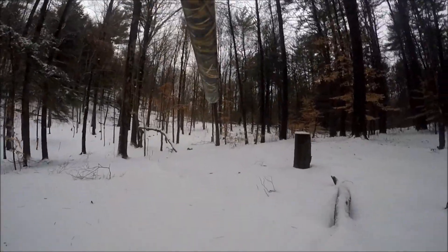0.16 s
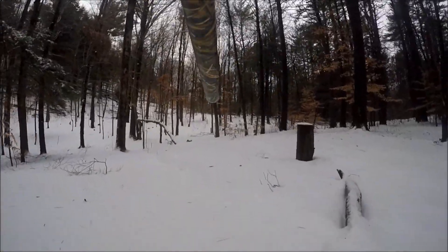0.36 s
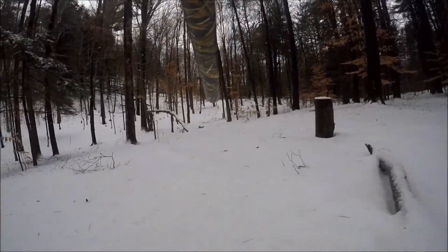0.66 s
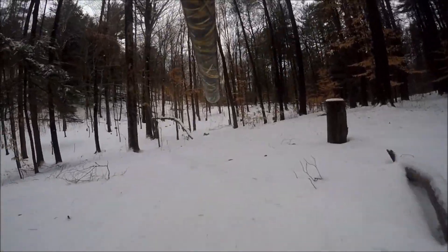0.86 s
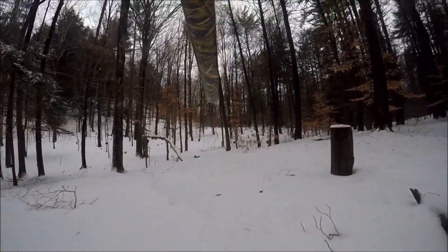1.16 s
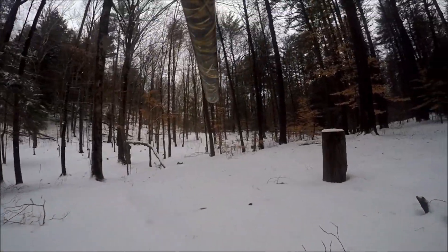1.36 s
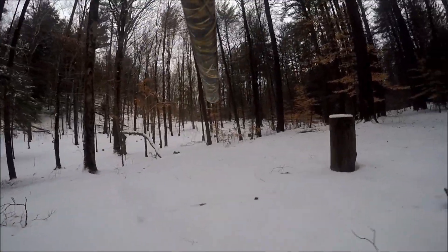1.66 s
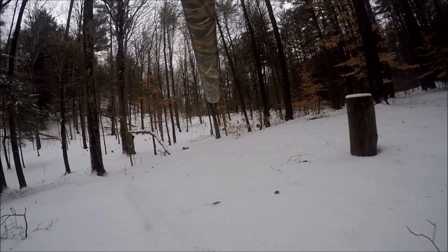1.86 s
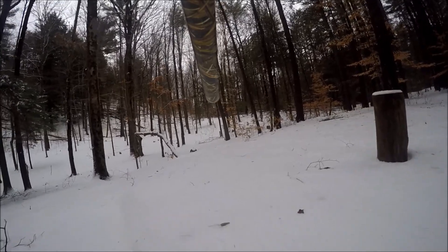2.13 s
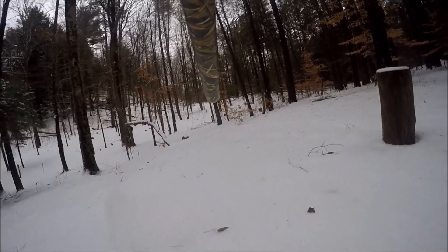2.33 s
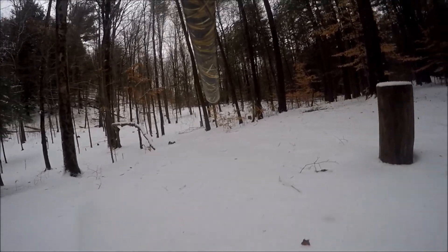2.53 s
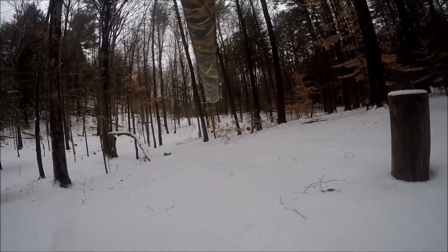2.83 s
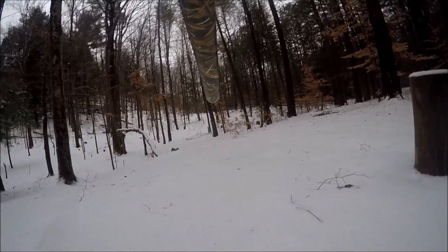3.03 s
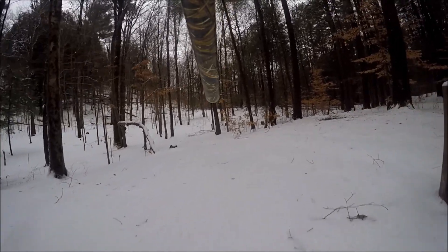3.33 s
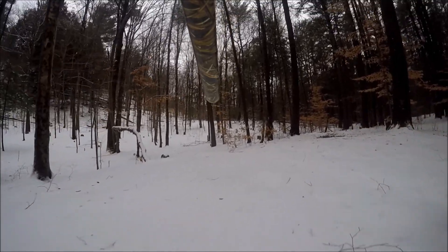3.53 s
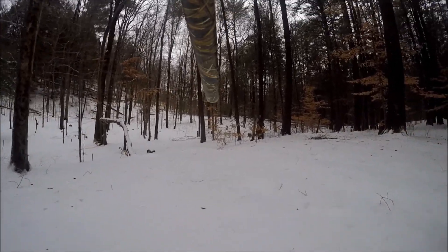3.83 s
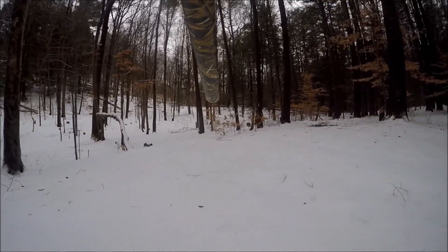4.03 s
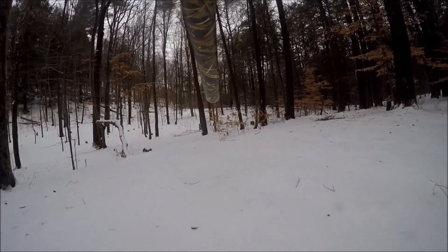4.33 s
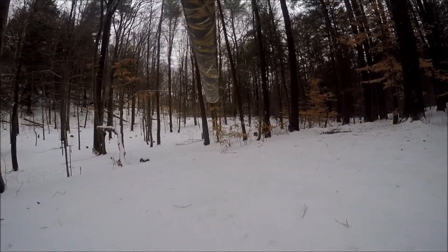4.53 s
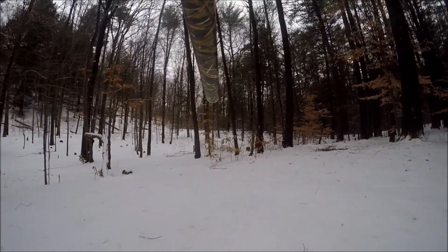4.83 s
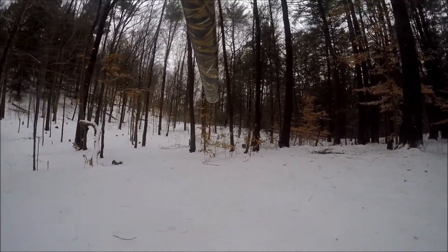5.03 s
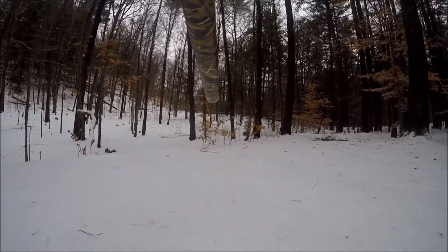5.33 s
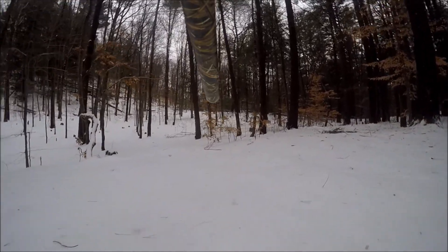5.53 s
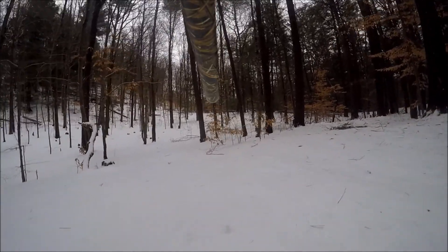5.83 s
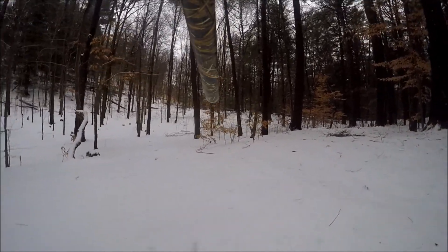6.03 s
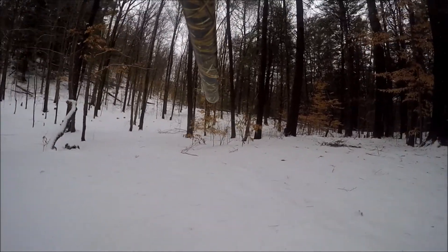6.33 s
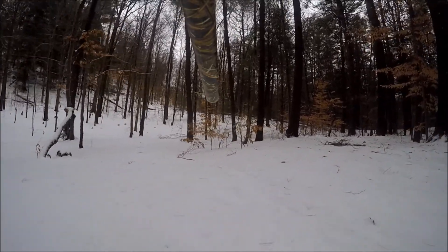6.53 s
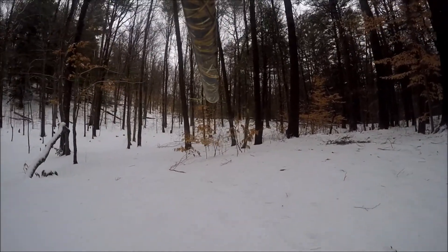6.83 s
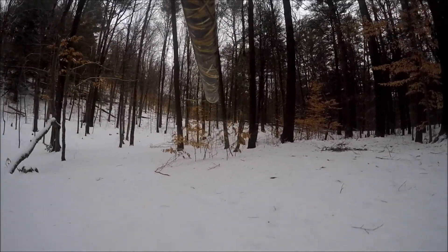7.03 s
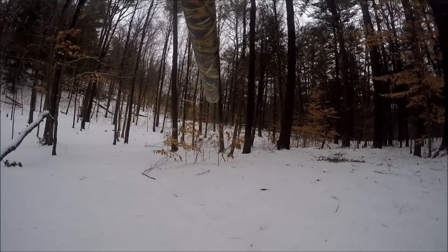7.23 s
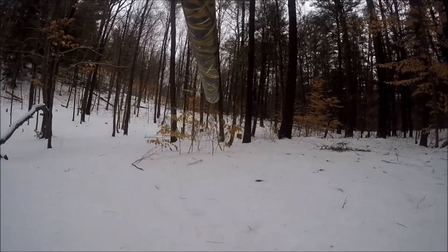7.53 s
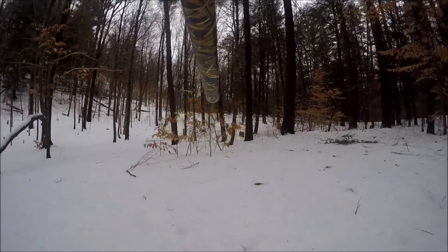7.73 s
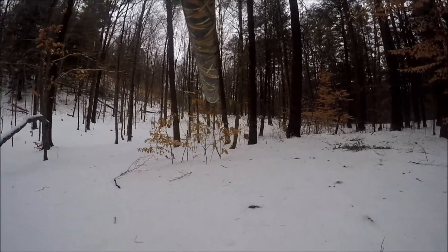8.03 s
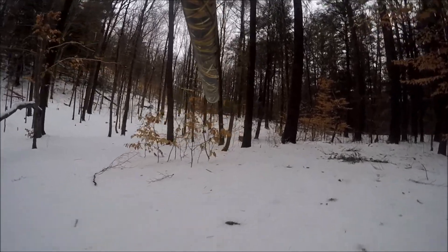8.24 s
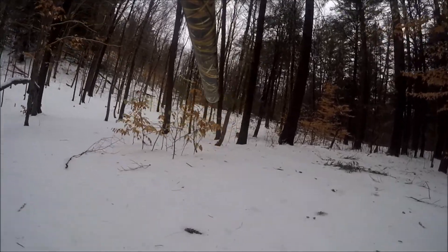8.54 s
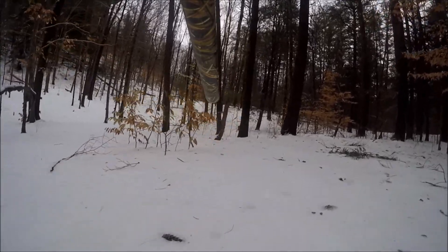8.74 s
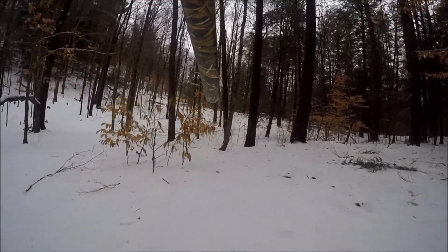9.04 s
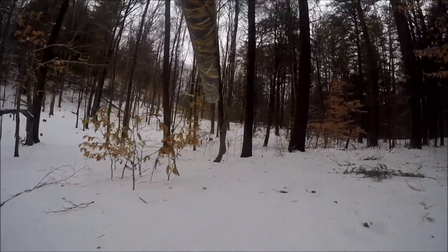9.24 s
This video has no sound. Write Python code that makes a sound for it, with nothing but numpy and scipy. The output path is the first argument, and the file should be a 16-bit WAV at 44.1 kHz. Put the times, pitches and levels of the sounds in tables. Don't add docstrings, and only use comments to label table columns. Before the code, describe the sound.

Steady walking on snow, heard close and mono through a hollow camera case. Dense, dry, squeaky-gritty crunches come every half to two-thirds of a second, some heavier with cracking crust, others soft and powdery. Brief brushing scuffs fill the gaps. The carrying pole knocks and hums around a low pitch, and the case ticks and taps. Behind it is only faint hiss and handling rumble, with no echo.

```python
import sys
import numpy as np
from scipy import signal
from scipy.fft import rfft, irfft, next_fast_len
from scipy.io import wavfile
from scipy.ndimage import uniform_filter1d

SR = 44100
rng = np.random.default_rng(int(sys.argv[2]) if len(sys.argv) > 2 else 0)


def invert_db(level):
    return 10 ** (np.asarray(level, dtype=float) / 20)


def log_audio(samples):
    frames = np.atleast_2d(samples).T
    limited = np.clip(frames, -1, 1)
    pcm = np.round(limited * 32767).astype(np.int16)
    wavfile.write(sys.argv[1], SR, pcm)


N = 413658
SIZE = next_fast_len(N + SR)
HZ = np.arange(SIZE // 2 + 1) * SR / SIZE + 1e-3
TIME = np.arange(N) / SR


def through(x, response):
    return irfft(rfft(x, SIZE) * response, SIZE)[:N]


def unit(x):
    return x / np.sqrt(np.mean(x ** 2))


def colour(points):
    hz, db = np.transpose(points)
    return invert_db(np.interp(np.log(HZ), np.log(hz), db))


def hollow(modes, open_db):
    out = invert_db(open_db)
    for f, width, db in modes:
        out = out + invert_db(db) * 1j * HZ * width / (f ** 2 - HZ ** 2 + 1j * HZ * width)
    return out


def band(lo_hz, hi_hz):
    return 1 / np.sqrt((1 + (lo_hz / HZ) ** 4) * (1 + (HZ / hi_hz) ** 4))


def walk(rate):
    held = int(SR / rate)
    return uniform_filter1d(np.repeat(rng.standard_normal(N // 10), held)[:N], held // 2 + 1)


def bursts(times, db, decay_s):
    kicks = np.zeros(N)
    np.add.at(kicks, (np.asarray(times) * SR).astype(int).clip(0, N - 1), invert_db(db))
    for hold_s in (decay_s, decay_s / 4):
        kicks = signal.lfilter([1], [1, -np.exp(-1 / (hold_s * SR))], kicks)
    return kicks * 6 / (decay_s * SR)


# start_s, crush_db, crack_peak_db, snow_airiness_db, drag_db (of the swing before)
HEELS = [(0.0, -39.5, -38, 2.5, -52.5), (0.6727, -31, -10.5, -4.5, -59), (1.264, -43.5, -33, 4.5, -59),
         (1.7618, -36.5, -21, 1.5, -64), (2.2478, -41, -19, 3.5, -59.5), (2.9016, -35, -6.5, 0.5, -62),
         (3.45, -49, -40, 6.5, -65.5), (4.1055, -33, -25.5, -1.5, -66), (4.7456, -50, -19, -1.3, -63),
         (5.3229, -47, -17, -1, -60), (5.9165, -34.5, -9, -3.5, -66.5), (6.37, -27.5, -10, -7, -64),
         (7, -54, -12, 0, -63.5), (7.4684, -33.5, -15, -2.5, -67), (8.087, -39.5, -40, -1.5, -61),
         (8.628, -34, -24, 0, -67), (9.25, -34.5, -16, -1.5, -64)]
# full_weight_s, lifts_s, crush_db, rise_db_per_s, fade_db_per_s
ROLLS = [(0.129, 0.233, -33, 302, 87), (0.748, 0.88, -27, 600, 90), (1.31, 1.447, -32, 600, 103),
         (1.868, 1.988, -33.5, 196, 45), (2.26, 2.466, -35, 590, 25), (2.984, 3.121, -30, 600, 40),
         (3.612, 3.768, -35, 200, 86), (4.22, 4.394, -32.5, 202, 51), (4.785, 4.921, -28, 338, 76),
         (5.391, 5.576, -28, 132, 68), (5.952, 6.085, -27, 592, 85), (6.504, 6.658, -28.5, 700, 61),
         (7.097, 7.22, -33, 12, 202), (7.622, 7.752, -32.5, 55, 156), (8.123, 8.256, -31.5, 480, 60),
         (8.695, 8.85, -30.5, 900, 49), (9.282, 9.407, -30.5, 646, 31)]
# start_s, length_s,
# level_db
SCUFFS = [(0.255, 0.031, -50), (0.277, 0.028, -47), (0.616, 0.024, -50), (1.11, 0.018, -73),
          (1.164, 0.023, -47.5), (1.189, 0.031, -50.5), (1.225, 0.035, -43), (1.46, .014, -40.5),
          (1.539, 0.044, -58), (1.992, 0.051, -44), (2.502, 0.044, -43), (3.083, 0.085, -54),
          (3.425, 0.014, -52), (4.06, 0.069, -59), (4.661, 0.021, -47), (4.704, 0.033, -52.5),
          (5.13, 0.024, -61), (5.782, 0.022, -43), (5.816, 0.03, -38), (5.844, 0.076, -48),
          (6.093, 0.029, -43.5), (6.666, 0.015, -53), (6.91, 0.096, -54), (7.74, 0.043, -58),
          (8.264, 0.024, -43), (8.316, 0.074, -57.5), (8.843, 0.052, -48.5), (8.943, 0.084, -63.5),
          (9.111, 0.039, -47), (9.153, 0.062, -44)]
HEEL_FADE_DB_S, LANDING_S, LIFTING_S = 81, 0.0019, 0.021
SETTLE_DB, SETTLE_S, DRAG_FLICKER_DB, SCUFF_EDGE_S = 8.5, 0.078, 3, 0.0072


def gait():
    press, swing, airy_db, lifted = np.zeros(N), np.zeros(N), np.zeros(N), -1
    for heel, (full, lifts, roll_db, rise, fade) in zip(HEELS, ROLLS):
        lands, heel_db, _, air_db, drag_db = heel
        a, b, c = (max(int(s * SR), 0) for s in (lifted, lands, lifts))
        t = TIME[b:c]
        roll = roll_db - np.where(t < full, rise * (full - t), fade * (t - full))
        strike = heel_db - HEEL_FADE_DB_S * (t - lands)
        landing = (t - lands + LANDING_S / 2) / LANDING_S
        lifting = (lifts - t) / LIFTING_S + 0.2
        contact = np.minimum(np.minimum(landing, lifting), 1)
        press[b:c] = np.hypot(invert_db(strike), invert_db(roll)) * contact
        swing[a:c] = invert_db(drag_db + SETTLE_DB * np.exp(-(TIME[a:c] - lifted) / SETTLE_S))
        airy_db[b:c], lifted = air_db, lifts
    scuff = np.zeros(N)
    for s, length, db in SCUFFS:
        edges = np.minimum(TIME - s, s + length - TIME) / SCUFF_EDGE_S
        scuff += invert_db(db) * np.clip(edges, 0, 1)
    return press, swing * invert_db(DRAG_FLICKER_DB * walk(30)), scuff, airy_db


# start_s, peak_db, high_share_db (re peak)
SNAPS = [(0.124, -16, -6), (0.18, -12, -26), (0.742, -1, -19), (0.7866, -14.5, -4), (0.8585, -4, -13),
         (1.297, -20, -2.5), (1.8398, -7.5, -16), (1.874, -8.5, -22), (2.4138, -11.5, -9.5),
         (2.9297, -9, -12), (2.972, -12.5, -3.5), (3.003, -18, -37), (3.6083, -14.5, -6),
         (4.133, -8.5, -24), (4.197, -7.5, -10), (4.217, -3.5, -27), (5.3616, -10, -33), (5.389, -11, -14),
         (5.436, -11, -9), (5.567, -12.5, -36), (5.9413, -2.5, -33), (6.4824, -9.5, -7.5),
         (6.4933, -10.5, -16), (6.553, -12, -16), (6.6368, -26, 2), (7.5007, -11.5, -32), (7.62, -9.5, -16),
         (7.7248, -14.5, -14), (8.691, -21, -21), (9.268, -13, -20)]
# start_s, peak_db, high_share_db (re peak)
CRUMBS = [(0.2864, -29, -22), (0.3586, -23.5, -12.5), (0.5152, -28, -6.5), (0.892, -20, -7.5),
          (0.9597, -22, -28), (1.1327, -9.5, -23), (1.515, -31, -2), (1.5346, -22.5, -20),
          (1.568, -30.5, -27), (1.6985, -30.5, -8), (2.513, -33, 10.5), (2.576, -27, -14),
          (2.6075, -30, -27), (3.1828, -24, -35), (3.1937, -24.5, -23), (3.971, -31, -20),
          (4.4363, -34.5, 3.5), (4.972, -33, 10.5), (5.048, -16, -15.5), (5.767, -22.5, -25),
          (6.6727, -24, -13), (6.712, -31.5, -6), (6.9123, -23.5, -2), (6.949, -28, 1.5),
          (7.2036, -28.5, 2), (7.8147, -24.5, -6.5), (7.957, -29, -32), (7.992, -26, -7.5),
          (8.043, -31, -8), (9.1595, -21, -20)]
CRACK_HIGH_DB = -32
SMALL_PER_S, SMALL_OVER_DB, SMALL_SPREAD_DB, SMALL_HIGH_DB = 30, 8, 2.5, -13.5


def crusts(press):
    cracks = [(s, db, CRACK_HIGH_DB) for s, _, db, _, _ in HEELS]
    chance = rng.random((SMALL_PER_S * N // SR, 3))
    at = (chance[:, 0] * N).astype(int)
    crush_db = 20 * np.log10(press[at] + 1e-9)
    small_db = crush_db + SMALL_OVER_DB - SMALL_SPREAD_DB * np.log(chance[:, 1] + 1 / 10)
    small = np.transpose([at / SR, small_db, SMALL_HIGH_DB + 12 * (chance[:, 2] - .5)])
    return np.vstack([cracks, SNAPS, CRUMBS, small]).T


PATCHY_DB = 1.4
SLIP_TOP_DB = 6.5


def crystals(rate, spread_db, own_db, shared_db):
    out, pack = 0, shared_db * walk(140)
    for hz in 170 * 2 ** np.arange(0, 6.8, .45):
        chance = rng.random((2, N))
        sizes = invert_db(-spread_db * np.log(chance[1] + 1e-9)) * rng.standard_normal(N)
        dense = unit((chance[0] < rate / SR) * sizes + 0.31 * rng.standard_normal(N))
        slip_db = np.minimum(pack + own_db * walk(min(hz / 12, 200)), SLIP_TOP_DB)
        evenness = min(1., (4000 / hz) ** 0.15)
        slips = invert_db(slip_db * evenness + PATCHY_DB * walk(18))
        out = out + rfft(dense * slips, SIZE) * np.exp(-(np.log2(HZ / hz) / .38) ** 2)
    return unit(irfft(out, SIZE)[:N])


# centre_hz, width_hz, level_db
CASE = [(1290, 205, -11), (1810, 430, -13.5), (2611, 280, -1), (3260, 180, -16.5), (4320, 1160, -13.5),
        (6730, 580, -21), (8300, 490, -33), (10550, 890, -20.5), (12900, 1400, -23)]
# frequency_hz, level_db
SNOW = [(100, 18.5), (300, 4.5), (1000, 1.5), (3000, 3), (7480, -5), (7720, -6.5), (10800, -10.5),
        (12000, -15.5), (15500, -17)]
# centre_hz, width_hz, level_db
DIPS = [(1632, 59, -15.5), (2100, 59, -0.5), (3190, 43, -12.5), (3915, 92, -18), (7850, 370, -2),
        (11370, 980, -4.5)]
PRESS_SHARE_DB, SWING_SHARE_DB, SCUFF_SHARE_DB = (-15, -6, -19.5), (-4, -21, -14), (-13.5, -4, -10)
FOLLOWS_AIR = (0.69, 1.16, 0.4)
DRIFT_DB = 4.5


def boots(press, swing, scuff, airy_db):
    dips = invert_db(sum(db / (1 + (2 * (HZ - f) / w) ** 2) for f, w, db in DIPS))
    ear = hollow(CASE, -16.5) * colour(SNOW) * dips
    bands_hz = ((1150, 3900), (140, 1150), (3900, 7700), (7700, 20000))
    shapes = [ear * band(lo, hi) ** 2 for lo, hi in bands_hz]
    grains, crust = crystals(5000, 1.8, 3.27, 2.2), rng.standard_normal(N)
    when, peak_db, high_db = crusts(press)
    snaps = [bursts(when, peak_db - 17.5, 0.0031),
             bursts(when, peak_db - 35.5, 0.0099),
             bursts(when, peak_db + high_db - 17, 0.0073),
             bursts(when, peak_db + high_db - 27.0, 0.0044)]
    crush = [press + swing + scuff]
    for p, s, b, follows in zip(PRESS_SHARE_DB, SWING_SHARE_DB, SCUFF_SHARE_DB, FOLLOWS_AIR):
        crush.append(press * invert_db(p + follows * airy_db) + swing * invert_db(s) + scuff * invert_db(b))
    crush[3] = crush[3] + swing * invert_db(SWING_SHARE_DB[2] - 7.5 + DRIFT_DB * walk(29))
    out = 0
    for level, trim_db, snap, shape in zip(crush, (-4.0, 1.0, -4.0, 0.0), snaps, shapes):
        out = out + through(grains * level * invert_db(trim_db), shape) / np.std(through(grains, shape))
        out = out + through(crust * snap, shape) / np.std(through(crust, shape))
    return out


# start_s, click_peak_db, pole_ring_db
KNOCKS = [(0.002, -33, -21.5), (0.107, -62, -23.5), (0.443, -34, -24.5), (0.612, -40, -35.5),
          (0.619, -62, -36.5), (1.028, -51, -33), (1.081, -45, -30), (1.135, -23, -21), (1.412, -47, -33),
          (1.878, -49, -35.5), (2.262, -31.5, -20), (2.652, -35.5, -28), (2.67, -46, -55),
          (2.692, -42, -55), (2.706, -37.5, -23.5), (2.728, -44, -55), (2.751, -47, -43), (2.795, -55, -48),
          (3.122, -41, -35.5), (3.447, -44, -25.5), (4.009, -46, -65), (5.049, -32, -19), (7.724, -29, -20)]
# time_s, level_db
SWAY = [(0.0, -20), (0.29, -42.5), (1.17, -35.5), (1.54, -43.5), (2.66, -44.5), (3.11, -45.5), (4.67, -44),
        (5.2, -43), (5.33, -45.5), (7.42, -52), (7.84, -44.5), (9.38, -43)]
# pitch_hz, level_db, t60_s
POLE = [(96.77, 4.5, 0.39), (107.14, 3, 0.6), (203.6, -13, 0.44)]
# centre_hz, width_hz, level_db
STRUCK = [(460, 150, 5), (826, 65, 14), (1330, 47, 17.5), (1900, 95, 5), (2550, 87, -44), (3070, 240, -9),
          (4150, 710, 1.5)]
RUMBLE_DB, RUMBLE_EASES_DB_S, RUMBLE_STEP_DB, HUM_STEP_DB, JOLT_S = -46, .5, 3.5, 1, 0.29


def pole(press):
    s, click_db, ring_db = np.transpose(KNOCKS)
    t, sway_db = np.transpose(SWAY)
    jolt = unit(uniform_filter1d(press, int(JOLT_S * SR)))
    ring = 0
    for k, (f, db, t60) in enumerate(POLE):
        decay = np.log(1000) / t60
        width = decay / np.pi
        mode = invert_db(db) * f * width / (f ** 2 - HZ ** 2 + 1j * HZ * width)
        ring = ring + (-1) ** k * mode / (decay / SR) / 2
    blows = through(bursts(s + 0.0052 * (s > .1), ring_db - 40, 0.0017), ring)
    shake = rng.standard_normal(N) * invert_db(4.0 * walk(14))
    hum_db = np.interp(TIME, t, sway_db) + HUM_STEP_DB * jolt
    hum = unit(through(shake, ring * band(44, 147) ** 2)) * invert_db(hum_db)
    strikes = rng.standard_normal(N) * bursts(s, click_db + 6.0, 0.0033)
    clicks = through(strikes, hollow(STRUCK, -32) * band(170, 2900))
    rumble_db = RUMBLE_DB - RUMBLE_EASES_DB_S * TIME + RUMBLE_STEP_DB * jolt
    rumble = unit(through(rng.standard_normal(N), band(8.5, 49) ** 3)) * invert_db(rumble_db)
    return blows + hum + clicks + rumble


# start_s, peak_db, pitch_hz
TAPS = [(0.314, -31.5, 400), (0.442, -28, 460), (0.454, -38, 428), (0.611, -25.5, 490), (0.635, -39, 440),
        (0.954, -43, 1060), (1.117, -30.5, 1360), (1.132, -34, 1330), (1.638, -39.5, 780),
        (1.662, -42, 318), (1.683, -32.5, 392), (2.213, -41, 780), (2.273, -22.5, 466), (2.606, -37, 780),
        (2.654, -33, 476), (2.695, -33, 276), (2.705, -26.5, 334), (3.187, -40.5, 634), (3.379, -49, 820),
        (3.449, -54, 1290), (4.009, -37.5, 800), (4.665, -38, 1330), (4.967, -24.5, 1286),
        (5.046, -32, 824), (5.326, -19, 1290), (6.821, -46, 735), (6.915, -28.5, 1240),
        (6.952, -27.5, 1266), (7.725, -20.5, 1312), (8.272, -28.5, 1330)]


def taps(t60=0.052, rattle=1.0):
    out, t = np.zeros(N + SR), np.arange(SR // 10) / SR
    push = (1 - np.exp(-t / 0.003)) * 1000 ** (-t / t60)
    for (s, db, hz), chance in zip(TAPS, rng.standard_normal((len(TAPS), len(t)))):
        ring = np.sin(2 * np.pi * hz * t) + 0.4 * np.sin(2 * np.pi * 1.9 * hz * t)
        rough = 1 + rattle * unit(uniform_filter1d(chance, size=150))
        start = int(s * SR)
        out[start:start + len(t)] += invert_db(db - 3.5) * ring * rough * push
    return out[:N]


# frequency_hz, level_db (per Hz)
HISS = [(76, -11), (130, 4), (165, -29), (909, -30), (1330, -16.5), (1590, -24.5), (2630, -16), (3090, -24),
        (4340, -19.5), (12600, -33), (15700, -35)]
HISS_DB = -59


def woods():
    return unit(through(rng.standard_normal(N), colour(HISS))) * invert_db(HISS_DB - 2.5 + 0.5 * walk(28))


def scene():
    press, swing, scuff, airy_db = gait()
    return (boots(press, swing, scuff, airy_db) + pole(press) + taps() + woods())[None]


def band_limit(x):
    return signal.sosfilt(signal.butter(12, 15810, fs=SR, output="sos"), x)


def record(dry):
    top_hz = 15290
    low_pass = signal.ellip(12, .2, 60, top_hz, fs=SR, output="sos")
    return band_limit(signal.sosfilt(low_pass, dry))


dry = scene()
out = record(dry)
log_audio(out)
```